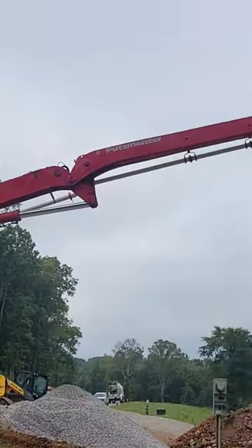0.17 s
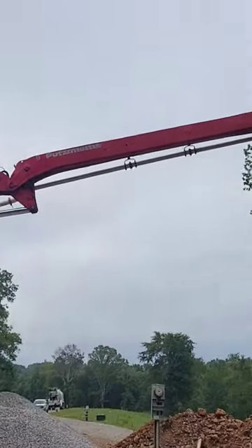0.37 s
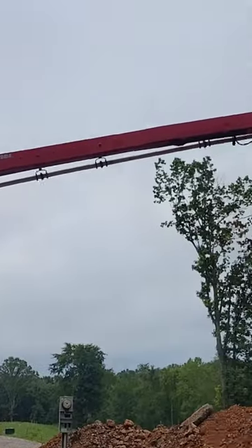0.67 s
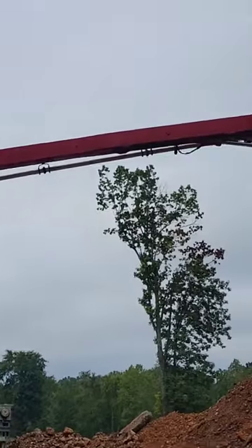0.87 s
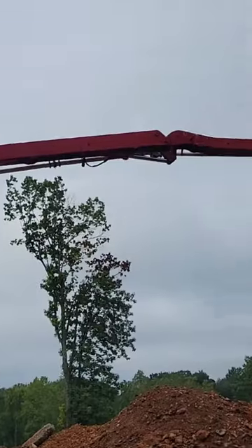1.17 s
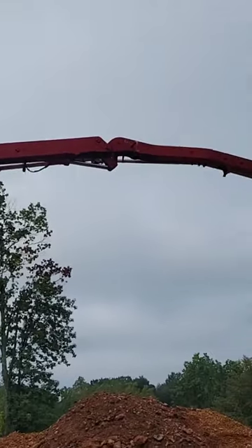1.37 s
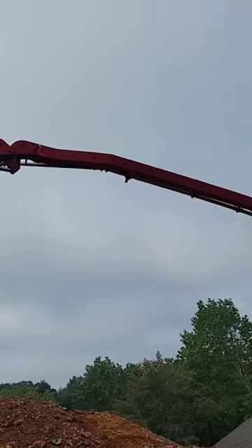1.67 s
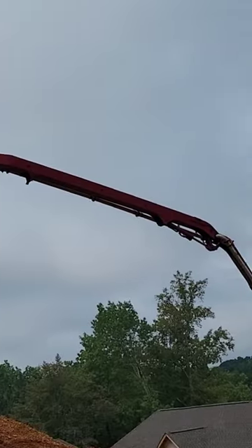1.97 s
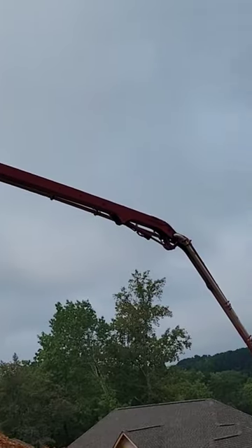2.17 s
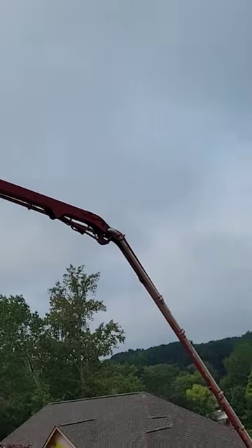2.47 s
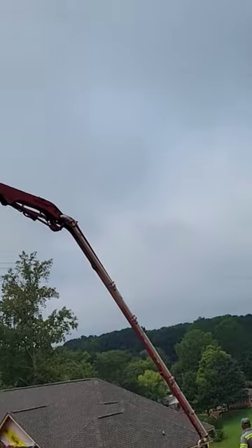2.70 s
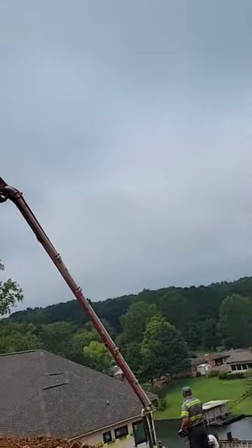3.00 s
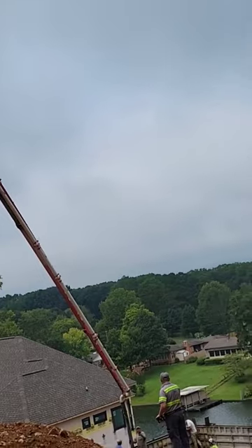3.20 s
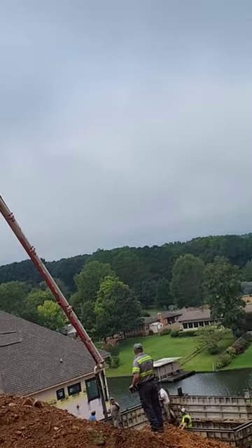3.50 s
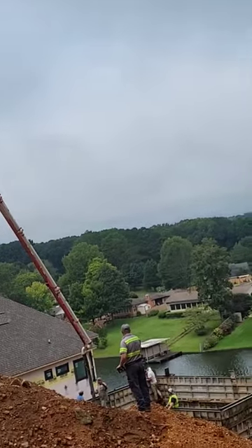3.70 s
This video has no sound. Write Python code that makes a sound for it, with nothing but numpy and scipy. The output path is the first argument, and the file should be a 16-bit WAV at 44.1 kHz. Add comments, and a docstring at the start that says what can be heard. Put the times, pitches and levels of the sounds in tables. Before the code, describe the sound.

A concrete pump truck's diesel engine drones steadily with a hydraulic whine and broad machinery roar.

```python
"""Concrete pump truck at work

A six-cylinder diesel drones at steady speed on a building site, with a hydraulic whine and steady hums,
all made of wavering sines. Engine and fans roar up to about 7 kHz, with microphone hiss above: shaped
noise that throbs, flickers and briefly surges. Low puffs of wind are short bursts of noise. A hand-held
two-port microphone turns slowly away, so sound reaches the right port later on the whole, and each port
is shaded differently."""
import sys
import numpy as np
from scipy import signal
from scipy.io import wavfile
from scipy.ndimage import uniform_filter1d

SR = 44100
rng = np.random.default_rng(int(sys.argv[2]) if len(sys.argv) > 2 else 0)


def persist_wave(psi):
    """Save psi, clipped to +-1, as 16-bit WAV."""
    counts = np.round(np.clip(psi, -1, 1) * 32767).astype(np.int16)
    wavfile.write(sys.argv[1], SR, np.atleast_2d(counts).T)


N = 169785

CYCLE_HZ = 13.335  # engine cycles per second; one cycle is two crank turns
HOP, SIZE = 512, 2048  # step and length of the short-time spectra, in samples


def gain_of(db):
    """Turns decibels into a gain factor."""
    return 10 ** (np.asarray(db) / 20)


def evened(x):
    """Scales a signal to an rms of 1."""
    return x / np.sqrt(np.mean(x ** 2) + 1e-20)


def curve(points, col, t):
    """Reads one column of a time table, with straight lines between the points."""
    rows = np.array(points, float)
    return np.interp(t, rows[:, 0], rows[:, col])


def read(points, col, hz):
    """Reads one column of a frequency table, along a logarithmic axis."""
    rows = np.array(points, float)
    return np.interp(np.log(hz + 1), np.log(rows[:, 0] + 1), rows[:, col])


def drift(t, rate_hz):
    """Irregular wandering of rms 1: 16 sines, from 0.3 Hz up to rate_hz, the faster the weaker."""
    waves = [np.sin(2 * np.pi * (f * t + rng.random())) / np.sqrt(f)
             for f in np.geomspace(.3, rate_hz, num=16)]
    return evened(sum(waves))


def tone(hz, db, waver_db, t):
    """A sine whose level wavers around db (rms)."""
    turns = np.cumsum(hz * np.ones(N)) / SR + rng.random()
    level = gain_of(db + waver_db * drift(t, rate_hz=16))
    return np.sqrt(2) * level * np.sin(2 * np.pi * turns)


def spectra(x):
    """Short-time spectra: cuts the sound into overlapping slices and splits each by frequency."""
    return signal.stft(x, SR, nperseg=SIZE, noverlap=SIZE - HOP)


def engine_drone(t):
    """Exhaust and gear tones sit at whole multiples of the engine cycle and share one changing level."""
    # Tones: (multiple of the cycle, level before the drone curve [dB rms], waver [dB rms])
    orders = [(4, -52, 2), (5, -48, 2), (6, -19, .65), (8, -35.5, 1), (9, -48, 2), (10, -42, 1.2),
              (12, -44.5, 1.5), (22, -47, 2), (24, -50, 2), (26, -48, 2), (28, -51, 2), (30, -52, 2),
              (37, -52, 2), (38, -50, 2), (42, -51, 2), (60, -47, 2.5), (90, -47, 2.5), (128, -59, 2),
              (131, -60, 3), (132, -58, 2)]
    # Shared change of level: (time [s], level [dB])
    drone_level = [(0, 0), (.12, -1), (.3, 1.5), (.65, 2.5), (.93, 1.2), (1.11, 1.8), (1.15, -.6),
                   (1.8, .2), (2.3, -.5), (3.85, -.3)]
    engine = sum(tone(multiple * CYCLE_HZ, db, waver_db, t) for multiple, db, waver_db in orders)
    return engine * gain_of(curve(drone_level, 1, t))


def hydraulic_whine(t):
    """The hydraulic pump whines as one sine that glides in pitch and level."""
    # Whine: (time [s], pitch [Hz], level [dB rms])
    whine_path = [(0, 756, -33), (.15, 746, -32), (.4, 744, -32), (.65, 754, -34), (.93, 763, -31),
                  (1.2, 770, -29.5), (1.5, 770, -30.5), (2.2, 771, -31.5), (2.6, 774, -36.5),
                  (3.2, 775, -37), (3.85, 778, -36)]
    return tone(curve(whine_path, 1, t), curve(whine_path, 2, t), 0.4, t)


def machine_hums(t):
    """The machinery hums at fixed pitches, each wavering on its own."""
    # Hums: (pitch [Hz], level [dB rms], waver [dB rms])
    hum_list = [(174.8, -44, 3), (351, -43, 2), (429.7, -42, 1), (704, -48, 2), (3562, -62, 3)]
    return sum(tone(hz, db, waver_db, t) for hz, db, waver_db in hum_list)


def roar_and_hiss():
    """Engine and fan roar up to about 7 kHz, microphone hiss above: two noises with shared throb and flicker."""
    # Throb in step with the engine: (multiple of the cycle [-], depth at full share [0-1])
    throb_parts = [(1, .07), (2, .045), (6, .05), (12, .045)]
    # How much the noise throbs and flickers: (frequency [Hz], share [0-1])
    throb_share = [(100, 0.82), (400, 0.28), (1500, .9), (5000, 0.76), (8000, .3)]
    surge_hz, surge_width_hz = 2400, 440  # centre and spread of the band that surges
    patch_db, flicker_db = 1.12, 0.62  # rms unevenness; rms flicker at full share
    t = np.arange(N) / SR
    throb = sum(depth * np.cos(2 * np.pi * (multiple * CYCLE_HZ * t + rng.random()))
                for multiple, depth in throb_parts)
    noise = rng.standard_normal((2, N))
    hz, frames, plain = spectra(noise)
    share = read(throb_share, 1, hz)[:, None]
    throbbing = share * spectra(noise * throb)[2]
    surge_band = np.exp(-.5 * ((hz[:, None] - surge_hz) / surge_width_hz) ** 2)
    surging = surge_band * spectra(noise * surges(t))[2]
    # Random level patches, smoothed over 20 frequency bins and 4 frames
    patches = rng.standard_normal((len(frames), len(hz))).T
    patches = uniform_filter1d(patches, size=20, axis=0)
    patches = evened(uniform_filter1d(patches, size=4, axis=1))
    flicker = share * drift(frames, rate_hz=20)
    return (plain + throbbing + surging) * gain_of(patch_db * patches + flicker_db * flicker)


def surges(t):
    """Short gritty surges and dips of the roar, as the gain to add to the normal gain of 1."""
    # Surges, below 0 a dip: (time of the middle [s], level at the middle [dB])
    surge_list = [(.1, 4.5), (.24, 1), (.315, 2), (.49, 2.5), (.606, 5), (.71, -3), (.765, 2), (.82, -3),
                  (1.51, 5)]
    surge_s = 0.015  # two standard deviations of the bell-shaped swell
    level_db = sum(db * np.exp(-.5 * (2 * (t - s) / surge_s) ** 2) for s, db in surge_list)
    return gain_of(level_db) - 1


def wind(hz, frames):
    """Puffs of wind on the ports: low bursts of noise, unrelated at the two ports."""
    # Puffs: (time of the middle [s], length [s], level [dB per Hz], frequency where it is halved [Hz])
    puffs = [(.06, 0.057, -50, 500), (0.197, .08, -44, 90), (.3, .08, -55, 220), (0.612, .04, -46, 230),
             (.8, .04, -54, 200), (1.02, .05, -52, 230), (1.207, .04, -60, 200), (1.386, .07, -47.5, 200),
             (3.46, .04, -59, 220)]
    shape = 0
    for s, length_s, db, top_hz in puffs:
        colour = 1 / (1 + (hz / top_hz) ** 4)
        swell = np.exp(-.5 * (2 * (frames - s) / length_s) ** 2)
        shape = shape + gain_of(db) * np.outer(colour, swell)
    return shape * spectra(rng.standard_normal((2, N)))[2]


def scene():
    """Each port has its own shade of the sound; the delay of the right port changes with the turn."""
    # Turn of the microphone: (time [s], turn [0 facing - 1 turned away])
    turn_path = [(0, 0), (.15, .01), (.4, .1), (.65, .22), (.9, .42), (1.15, .53), (1.45, .7), (1.85, .8),
                 (2.25, .86), (2.75, .94), (3.45, 1)]
    # Turns at which shade and delay are listed: (four bearings [0 facing - 1 turned away])
    bearings = (0, .3, .72, .95)
    # Engine and fan roar up to about 7 kHz, microphone hiss above:
    # (frequency [Hz], left port at the four bearings [dB per Hz], right port the same [dB per Hz])
    port_levels = [(25, -64, -59, -62, -63, -57, -59, -63, -63),
                   (45, -57, -54, -56, -58, -56, -53, -55, -57),
                   (65, -53, -49, -51, -53, -52, -48, -50, -52),
                   (93, -52, -53, -54, -58, -51, -52, -53, -57),
                   (147, -53, -56, -58, -60, -52, -55, -57, -59),
                   (200, -54, -55, -59, -62, -53, -54, -59, -62),
                   (250, -54, -59, -58, -61, -52, -56, -57, -61),
                   (310, -57, -58, -56, -61, -56, -55, -55, -60),
                   (390, -54, -56, -57, -58, -56, -58, -56, -57),
                   (465, -58, -53, -61, -60, -63, -61, -64, -60),
                   (600, -56, -58, -59, -60, -57, -59, -63, -62),
                   (680, -59, -57, -60, -59, -59, -57, -60, -61),
                   (790, -57, -55, -56, -55, -55, -52, -56, -56),
                   (870, -62, -59, -63, -64, -66, -60, -61, -65),
                   (1000, -61, -63, -63, -65, -62, -64, -62, -64),
                   (1250, -63, -62, -63, -70, -62, -61, -61, -66),
                   (1550, -63, -66, -73, -75, -65, -65, -68, -68),
                   (1800, -63, -67, -71, -72, -64, -65, -67, -69),
                   (2150, -67, -67, -68, -71, -69, -67, -75, -72),
                   (2350, -63, -62, -64, -67, -69, -71, -77, -70),
                   (2500, -65, -60, -64, -65, -70, -77, -75, -69),
                   (2650, -65, -64, -68, -68, -74, -79, -75, -73),
                   (2800, -69, -70, -71, -74, -77, -75, -78, -79),
                   (3050, -67, -70, -68, -75, -78, -74, -76, -83),
                   (3250, -73, -72, -70, -75, -76, -73, -79, -80),
                   (3600, -75, -67, -68, -75, -76, -72, -74, -80),
                   (3950, -72, -70, -71, -75, -72, -72, -73, -79),
                   (4300, -82, -80, -77, -78, -79, -81, -79, -83),
                   (4800, -82, -74, -75, -74, -81, -76, -86, -85),
                   (5100, -82, -81, -82, -78, -85, -83, -90, -86),
                   (5650, -87, -88, -84, -84, -91, -90, -88, -88),
                   (6150, -77, -78, -82, -77, -86, -84, -82, -87),
                   (6500, -80, -78, -88, -84, -88, -86, -88, -89),
                   (7000, -81, -85, -90, -90, -94, -101, -102, -105),
                   (8200, -114, -110, -102, -108, -122, -120, -116, -120),
                   (9500, -93, -94, -97, -97, -108, -105, -109, -109),
                   (11000, -93, -91, -90, -92, -101, -100, -101, -102),
                   (15000, -90, -89, -91, -92, -98, -98, -99, -101)]
    # Likeness of the noise at the two ports: (frequency [Hz], likeness [0-1])
    likeness = [(25, .35), (60, .88), (130, .98), (250, .93), (450, .85), (800, .93), (1250, .9),
                (1700, .62), (2500, .84), (3000, .5), (3800, .8), (4400, .55), (4900, .72), (5600, .5),
                (6200, .68), (7000, .3), (15000, .2)]
    # Delay of the right port: (frequency [Hz], delay at the four bearings [ms])
    right_delay = [(80, 0.61, 0.73, 0.9, 0.91), (160, 0.02, -0.03, 0.28, 0.38),
                   (300, 0.43, 0.65, 0.63, 0.71), (430, 0.56, 0.69, 0.89, 0.8),
                   (600, 0.22, 0.32, 0.51, 0.67), (780, 0.41, 0.44, 0.46, 0.57),
                   (1000, 0.29, 0.41, 0.45, 0.47), (1300, 0.29, 0.34, 0.4, 0.4),
                   (1550, 0.28, 0.35, 0.37, 0.47), (1800, 0.26, 0.3, 0.53, 0.59),
                   (2150, 0.26, 0.38, 0.52, 0.58), (2450, 0.23, 0.39, 0.58, 0.61),
                   (2700, 0.2, 0.49, 0.69, 0.6), (2950, 0.08, 0.18, 0.25, 0.53),
                   (3250, 0.17, 0.22, 0.36, 0.51), (3600, 0.14, 0.24, 0.38, 0.49),
                   (3950, 0.11, 0.24, 0.38, 0.45), (4300, 0.13, 0.23, 0.4, 0.5),
                   (4800, 0.22, 0.27, 0.39, 0.5), (5200, 0.21, 0.22, 0.31, 0.48),
                   (5650, 0.24, 0.3, 0.34, 0.49), (6200, 0.2, 0.34, 0.38, 0.48)]
    t = np.arange(N) / SR
    hz, frames, tones = spectra(engine_drone(t) + hydraulic_whine(t) + machine_hums(t))
    shared, other = roar_and_hiss()
    # Weight of each listed bearing in each frame
    turn = curve(turn_path, 1, frames)
    weights = np.array([np.interp(turn, bearings, row) for row in np.eye(4)])
    shade = np.array([read(port_levels, col, hz) for col in range(1, 9)])
    left_db, right_db = shade[:4].T @ weights, shade[4:].T @ weights
    same = np.clip(read(likeness, 1, hz), 0, 1)[:, None]
    lag_s = np.array([read(right_delay, col, hz) for col in range(1, 5)]).T @ weights / 1000
    # The tones share the ports' level difference, half up and half down
    tilt = gain_of((left_db - right_db) / 2)
    per_hz = np.sqrt(SR / 2)  # brings white noise of rms 1 to 0 dB per Hz
    left = tones * tilt + per_hz * gain_of(left_db) * shared
    right_noise = same * shared + np.sqrt(1 - same ** 2) * other
    right = tones / tilt + per_hz * gain_of(right_db) * right_noise
    # Turning the phase of each frequency delays it
    late_right = right * np.exp(-2j * np.pi * hz[:, None] * lag_s)
    ports = np.array([left, late_right]) + per_hz * wind(hz, frames)
    return signal.istft(ports, SR, nperseg=SIZE, noverlap=SIZE - HOP)[1][:, :N]


def record(dry):
    """The microphone's low cut takes away rumble, then a band limit takes away the highest treble."""
    low_cut_hz, edge_hz = 30, 15550
    low_cut = signal.butter(2, low_cut_hz, "high", fs=SR, output="sos")
    thin = signal.sosfilt(low_cut, dry)
    band_limit = signal.firwin(511, edge_hz, window=("kaiser", 9), fs=SR)
    return signal.oaconvolve(thin, band_limit[None], "same")


dry = scene()
out = record(dry)
persist_wave(out)
```